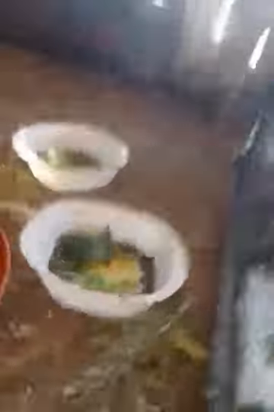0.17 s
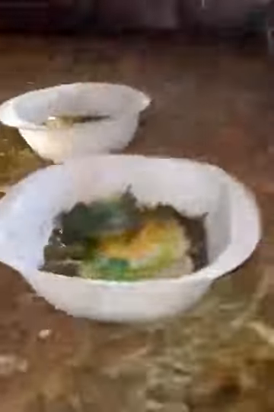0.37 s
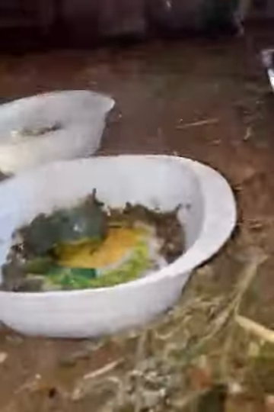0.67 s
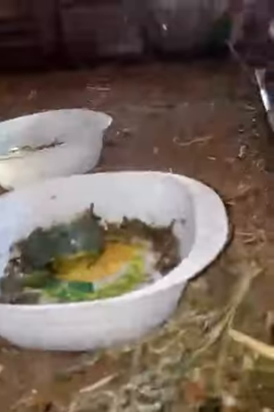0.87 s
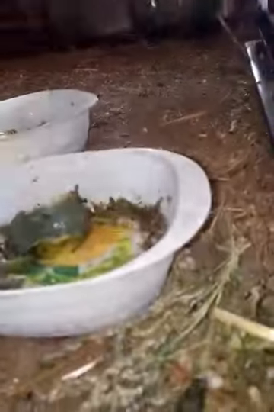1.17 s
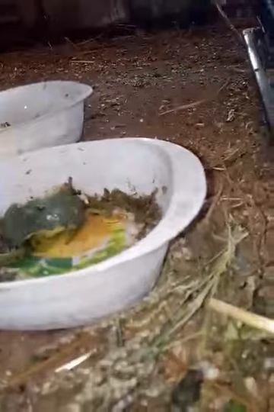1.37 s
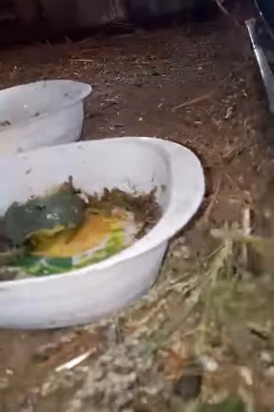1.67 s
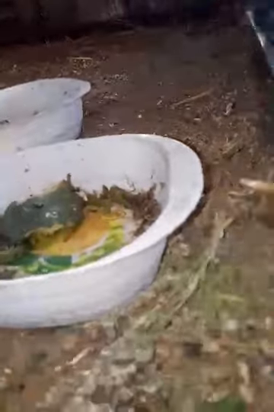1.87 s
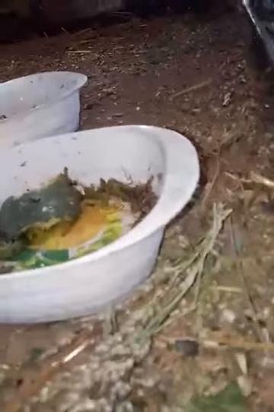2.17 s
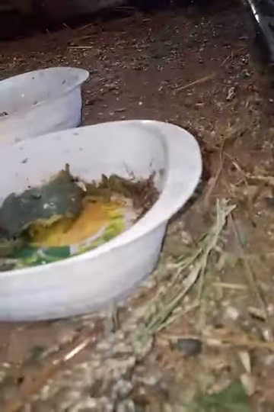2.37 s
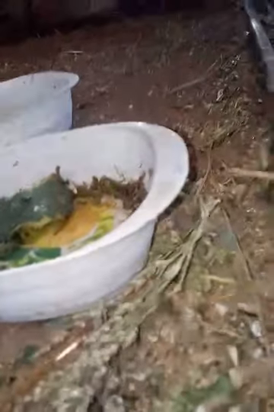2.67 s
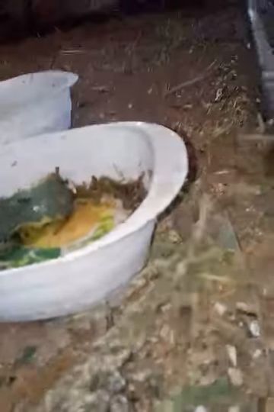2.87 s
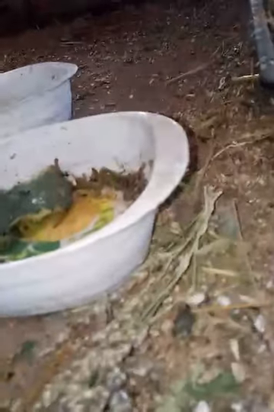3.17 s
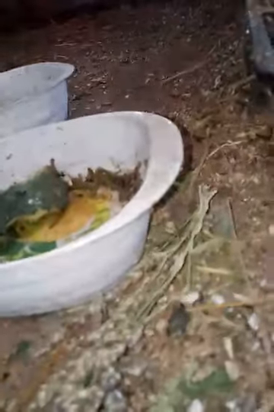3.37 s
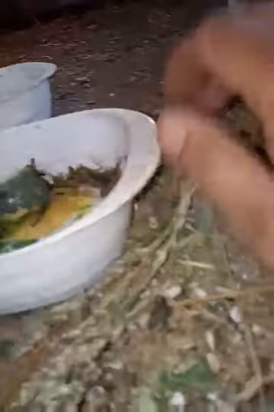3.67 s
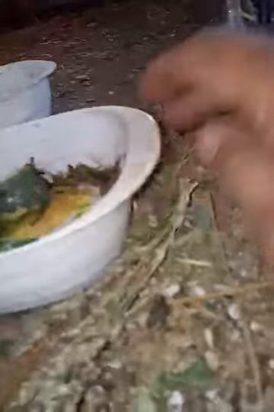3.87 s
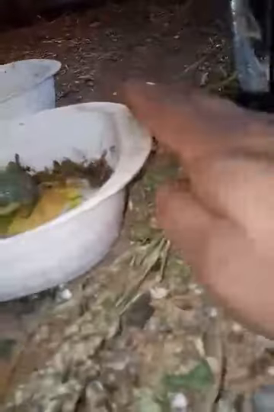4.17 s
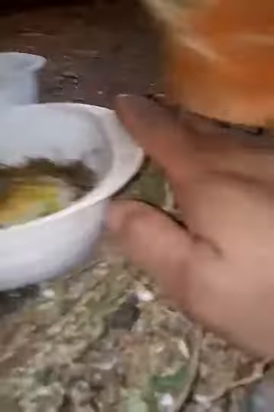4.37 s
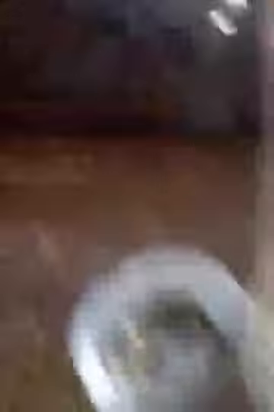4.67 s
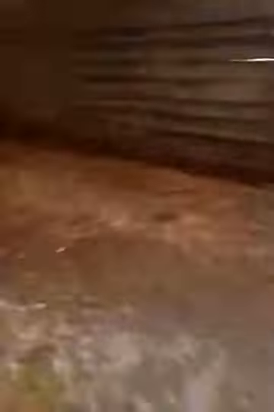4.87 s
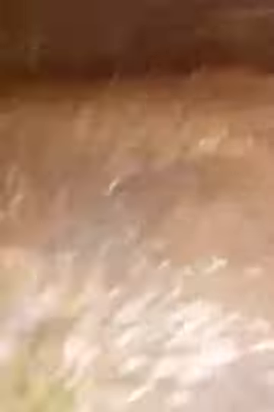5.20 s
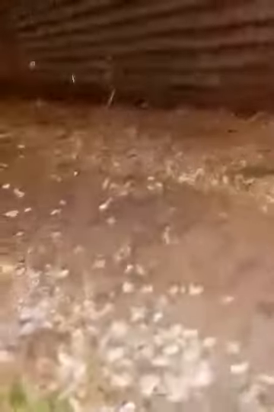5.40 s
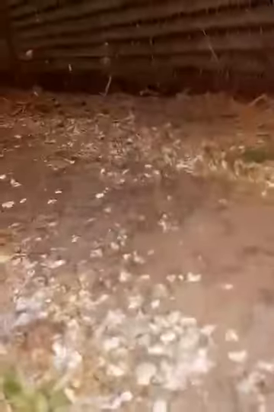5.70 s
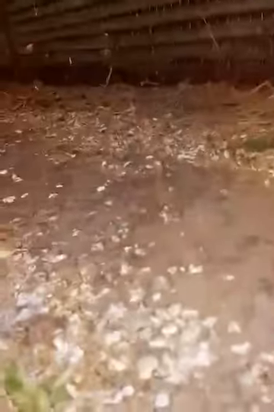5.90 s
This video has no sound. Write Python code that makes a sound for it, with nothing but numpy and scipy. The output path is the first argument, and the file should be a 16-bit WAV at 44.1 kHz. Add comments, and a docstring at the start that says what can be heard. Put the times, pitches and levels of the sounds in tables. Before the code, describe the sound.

A close handheld microphone in a small wire aviary, its right side muffled by a hand, over a faint low draught. In the first 0.3 seconds come tiny high chirps and a few wing flicks. Dull falling-pitched finger bumps and scuffs cluster from 0.2 to 1.1, mostly on the right, with a hoarse falling chirp at 0.9. From 1.1 to 2.0 wings clap rapidly, about fifteen beats a second, loudest near 1.4, with a bright feather rush from 1.65. It calms; a short chirp at 2.35. From 2.8 to 3.25 a breathy rush swells, with soft regular flaps until 3.6. Quiet until a bump, a chirp at 4.05 and five flaps to 4.4. Brief hollow rings and scuffs surround flaps at 4.8 to 5.0. A hard knock lands at 5.35, then faint breathy pips at 5.5 to 5.8, a dull flap at 5.64 and a last flutter near 6.

```python
"""Small parrots in a wire aviary

Small parrots flutter about a wire aviary beside a hand-held phone whose right port is covered by the hand.
Wing tips clap as short puffs of noise in a few bands; feathers rush as shaped turbulence over a low draught.
A few birds chirp in gliding partials, a farther one pips, and hollow modes ring briefly. Fingers bump the
case in waves of falling pitch and skin scuffs the port; sparse echoes follow the birds, and gain control ducks.
"""
import sys
import numpy as np
from scipy import signal
from scipy.fft import rfft, irfft
from scipy.io import wavfile
from scipy.ndimage import uniform_filter1d

SR = 44100
rng = np.random.default_rng(int(sys.argv[2]) if len(sys.argv) > 2 else 0)


def digitize_waveform(pressure):
    """Quantize a signal to 16-bit integers and store it at the path in sys.argv[1].

    Rows of a 2-D input are taken as channels; values are limited to [-1, 1].
    """
    field = np.atleast_2d(pressure).T
    bounded = np.clip(field, -1, 1)
    quanta = np.round(bounded * 32767).astype(np.int16)
    wavfile.write(sys.argv[1], SR, quanta)


N = 266319  # samples
EDGE_HZ = 15950  # upper band limit

# Contours of the calls: (share of length, pitch ratio, level [dB])
ARCH = [(0, 1.02, -10), (.13, .9, -7), (.25, .945, 0), (.38, .995, -1), (.5, .995, -1), (.61, .955, 2),
        (.8, .815, -4), (1, .69, -18)]
STEP = [(0, 1.03, -10), (.25, 1, 0), (.5, 1, 2), (.6, 1.2, -3), (.72, 1.27, -1), (1, 1.15, -8)]
FALL = [(0, .9, -12), (.1, 1, 2), (.27, 1.005, -1), (.47, .94, -3), (.57, .83, 0), (.7, .765, 2),
        (.8, .64, -4), (1, .65, -5)]
FLAT = [(0, 1, -18), (.5, 0.99, 2), (1, 1, -38)]
HOOK = [(0, .98, -10), (.09, .865, -1), (.28, .915, -1), (.45, .98, -3), (.56, 1, 0), (.64, .96, 0),
        (.74, .83, -4), (.92, .68, -9), (1, .65, -14)]


def amp(db):
    """Decibels express the logarithm of an amplitude ratio; this inverts them."""
    return 10 ** (np.asarray(db) / 20)


def evened(x):
    """Normalisation to unit root-mean-square strength."""
    return x / np.sqrt(np.mean(x ** 2) + 1e-20)


def read(points, hz):
    """Interpolation of a table along a logarithmic frequency axis."""
    f, value = np.transpose(points)
    return np.interp(np.log(hz + 1), np.log(f + 1), value)


def add(mix, s, sound):
    """Superposition: a sound is summed into the mix at s seconds."""
    part = mix[..., max(round(s * SR), 0):][..., :sound.shape[-1]]
    part += sound[..., :part.shape[-1]]


def coloured(x, points):
    """Spectral shaping: x is filtered by a table, then brought to unit strength."""
    gain = amp(read(points, np.fft.rfftfreq(len(x), 1 / SR)))
    return evened(irfft(rfft(x) * gain, len(x)))


def smoothed(x, span):
    """Two running means in succession act as a low-pass filter."""
    return uniform_filter1d(uniform_filter1d(x, size=span), size=span)


def resonate(x, hz, width):
    """Resonance by heterodyne: shifts hz down to zero, smooths twice, and shifts back."""
    turn = np.exp(2j * np.pi * hz * np.arange(len(x)) / SR)
    r = np.exp(-np.pi * width / SR)
    envelope = signal.lfilter([(1 - r) ** 2], [1, -2 * r, r * r], x / turn)
    return 2 * (turn * envelope).real


def lumps(lump_s, depth_db):
    """Random amplitude modulation: strength comes in lumps, as feathers and gusts do."""
    span = max(int(lump_s * SR), 2)
    return amp(depth_db * evened(smoothed(rng.standard_normal(N), span)))


def patchy(x, depth_db):
    """Time-frequency modulation: patches of pitch stand out and fade, as single feathers catch the air."""
    z = signal.stft(x, nperseg=1024, noverlap=768)[2]
    field = uniform_filter1d(rng.standard_normal(z.shape[1:]), size=5, axis=0)
    field = uniform_filter1d(field, size=6, axis=1)
    return signal.istft(z * amp(depth_db * evened(field)), nperseg=1024, noverlap=768)[1][:, :N]


def flight(t):
    """Turbulence levels add as amplitudes: background stir plus each flurry's rise, hold and fade."""
    # background stir of the flock: (time [s], feather rush [dB], fine rustle [dB], treble [dB])
    stir = [(0, -33.5, -34.5, -55), (.12, -52.5, -42, -66), (.24, -37, -42.5, -60),
            (.33, -42.5, -33.5, -53), (.42, -37.5, -51, -84), (.75, -42.5, -40, -64),
            (1.1, -46.5, -45.5, -62), (1.5, -43, -44.5, -60.5), (2.2, -35.5, -46, -79),
            (2.4, -41, -42.5, -67), (2.6, -41, -45.5, -68), (3.6, -43, -41, -65.5), (3.95, -44, -47, -72.5),
            (4.2, -38.5, -42, -63), (4.55, -42, -40, -56.5), (4.7, -54.5, -42.5, -61),
            (4.95, -51, -40.5, -63), (5.3, -40.5, -43, -55.5), (5.42, -43, -54.5, -61),
            (5.55, -47.5, -46.5, -65), (5.95, -49, -65, -79)]
    # a bird bursts into flight near the mesh: (start [s], held [s], rush [dB], rustle [dB], treble [dB],
    # brightness change while held [dB/s])
    flurries = [(0.493, 0.03, -39.5, -45, -53, 41), (0.854, 0.11, -34.5, -47, -73, 37),
                (1.643, 0.39, -27, -26.5, -45, -29.5), (2.632, 0.11, -34.5, -49, -79, -13),
                (2.785, 0.45, -24.5, -41, -58, 12), (5.65, 0.097, -39.5, -48, -72, -8),
                (5.976, .06, -34, -45.5, -64, -30)]
    takeoff_db, takeoff_s = 4, 0.019  # first strokes are hardest
    rise_s, settle_db_per_s = 0.0036, 77
    s, *levels = np.transpose(stir)
    gains = np.array([amp(np.interp(t, s, c)) for c in levels])
    for start, held, rush_db, rustle_db, treble_db, brighten_db in flurries:
        u = np.maximum(t - start, 0)
        shape_db = takeoff_db * np.exp(-u / takeoff_s) - settle_db_per_s * np.maximum(u - held, 0)
        bright_db = brighten_db * np.minimum(u, held)
        layers_db = np.array([rush_db + 0 * u, rustle_db + bright_db, treble_db + bright_db])
        gains = gains + np.minimum(u / rise_s, 1) * amp(shape_db + layers_db)
    return gains


def feathers():
    """Turbulent noise in four layers, drawn twice: once for each path to the ports."""
    # spectra of the layers: (frequency [Hz], relative density [dB per Hz])
    rush_colour = [(180, -24), (300, -15.5), (401, -10.5), (585, -7.5), (695, -12.5), (954, 0.5), (1220, 4),
                   (1860, -1.5), (2600, -65), (3380, -72), (5720, -120)]
    rustle_colour = [(1290, -15.5), (2200, 0.5), (2810, -1), (3350, 4.5), (3850, 2.5), (4350, -2),
                     (6700, -32), (7500, -47), (9750, -47), (16500, -120)]
    treble_colour = [(3820, -2.5), (6500, -4), (7880, -10.5), (9990, -9), (14500, -13.5), (16000, -9)]
    draught_colour = [(15, -65), (25, -25), (63, 0.5), (108, 5), (312, -2), (345, -4.5), (435, -2.5),
                      (800, -8), (1040, -23.5), (1760, -120)]
    # level of the low draught, before its gusts: (time [s], level [dB])
    draught_levels = [(0, -37.5), (.35, -43.5), (.5, -37.5), (1.15, -41), (1.4, -44.5), (2, -41),
                      (2.3, -39.5), (3.2, -37), (3.5, -45), (3.9, -38.5), (4.35, -45.5), (4.62, -37.5),
                      (4.75, -46.5), (5.1, -39.5), (5.6, -42.5), (6.03, -48)]
    t = np.arange(N) / SR
    rush, rustle, treble = flight(t)
    draught = amp(np.interp(t, *np.transpose(draught_levels)))
    strokes, grain = lumps(0.023, depth_db=1.25), lumps(0.0016, depth_db=1.5)
    gusts = lumps(0.019, depth_db=3.0)
    feather_noise = patchy(rng.standard_normal((2, N)), depth_db=2.54)
    paths = []
    for feather, wind in zip(feather_noise, rng.standard_normal((2, N))):
        beaten = feather * strokes * grain
        paths.append(rush * coloured(beaten, rush_colour) + rustle * coloured(beaten, rustle_colour)
                     + treble * coloured(beaten, treble_colour)
                     + draught * coloured(wind * gusts, draught_colour))
    return paths


def ring(row, noise):
    """Modal resonance: rubbing keeps one hollow mode sounding for a moment."""
    s, peak_db, hz, ms = row
    tone = resonate(noise, hz, 0.26 * hz)[-max(int(ms * SR / 1000), 9):]
    return s, amp(peak_db) * tone / abs(tone).max() * signal.windows.tukey(len(tone), .4)


def scuffs():
    """Stick-slip friction: skin sticks and slips in dull, gritty bursts."""
    # skin sliding over the covered port: (start [s], length [s], level [dB])
    slides = [(0.123, 0.11, -42), (0.316, 0.086, -31.5), (0.498, 0.078, -31), (1, 0.19, -36.5),
              (4.585, 0.046, -35), (4.911, 0.031, -32), (4.977, 0.13, -27)]
    # spectrum of the friction: (frequency [Hz], relative density [dB per Hz])
    skin_colour = [(100, 3), (300, -1.5), (600, 9.5), (1200, -10.5), (1800, -2.5), (4000, -39),
                   (16000, -109)]
    gate = np.zeros(N)
    for s, length, db in slides:
        add(gate, s, amp(db) * signal.windows.tukey(max(int(length * SR), 9), .4))
    return gate * coloured(rng.standard_normal(N) * lumps(0.0012, depth_db=7.0), skin_colour)


def bump(row, noise):
    """Dispersion of flexural waves: quick waves arrive first, so the pitch drops within a few cycles."""
    s, peak_db, drop_hz, ms, pan_db = row
    t = np.arange(len(noise)) / SR
    u = t * 1000 / max(ms, .3)  # time in units of the flex time
    uneven = evened(smoothed(noise, 60))
    hz = (85 + drop_hz * np.exp(-.9 * u)) * (1 + 0.2 * uneven)
    turn = 2 * np.pi * np.cumsum(hz) / SR
    decay = np.exp(-(u / 3.2) ** 2) + 0.22 * np.exp(-(u / 7.8) ** 2)
    flex = np.sin(turn) * (1 - np.exp(-3.0 * u)) * decay
    nail_tick = 0.21 * smoothed(noise, 6) * np.exp(-t / 0.0018)
    wave = flex + nail_tick
    ports = amp([[pan_db / 2], [-pan_db / 2]])
    return s, amp(peak_db) * wave / abs(wave).max() * ports / ports.mean()


def pip(row, noise):
    """Noise-excited resonances form a breathy whistle a few milliseconds long."""
    # breathy partials: (frequency [Hz], width [Hz], level [dB])
    partials = [(2060, 600, 7), (3840, 930, 7.5), (5800, 890, -1.5)]
    s, level_db = row
    tone = sum(amp(db) * evened(resonate(noise, hz, width)) for hz, width, db in partials)
    return s, amp(level_db) * tone * np.hanning(len(noise))


def chirp(shape, start, length, pitch_hz, call_db, first_db, side_db, upper_db, hoarse):
    """Harmonic series set against its second partial, with a sideband; random wobble makes it hoarse."""
    # upper partials: (frequency [Hz], level relative to the second partial [dB])
    overtones = [(5600, -9), (7000, -29.5), (8000, -39), (10400, -28.5), (13000, -40)]
    first_fade_db = 61  # the first partial weakens as the pitch climbs: dB per unit of pitch ratio
    share, ratio, shape_db = np.transpose(shape)
    t = np.arange(0, length, 1 / SR)
    hz = pitch_hz * np.interp(t / length, share, ratio)
    level_db = call_db + np.interp(t / length, share, shape_db)
    wobble, flutter = (evened(smoothed(v, 40)) for v in rng.standard_normal((2, len(t))))
    turn = 2 * np.pi * np.cumsum(hz * (1 + 0.068 * hoarse * wobble)) / SR
    climb = np.maximum(hz / pitch_hz - 1, 0)
    second = np.sin(2 * turn)
    first = amp(first_db - first_fade_db * climb) * np.sin(turn)
    sideband = amp(side_db) * np.sin(2 * turn + 2 * np.pi * 1250 * t)
    tone = second + first + sideband
    for k in np.arange(3, 7):
        partial = amp(upper_db + read(overtones, k * hz)) * np.sin(k * turn)
        tone += partial * (k * hz < EDGE_HZ)
    throb = (1 + 0.26 * np.sin(2 * np.pi * 140 * t)) * (1 + 0.19 * hoarse * flutter)
    return start, amp(level_db) * tone * throb * signal.windows.tukey(len(t), .1)


def clap(row, noise):
    """Impulsive excitation of resonances: a puff of noise swells to a snap, heard in a few bands."""
    s, peak_db, hz, body_db, treble_db, ms = row
    u = (np.arange(len(noise)) / SR - .004) * 1000 / max(ms, .3)  # time from the snap, per length
    swell, decay = np.exp(2.0 * np.minimum(u, 0)), np.exp(-1.4 * np.maximum(u, 0))
    puff = noise * np.where(u < 0, swell, decay)
    snap = puff + 1.2 * (np.arange(len(noise)) == round(.004 * SR))
    bands = [resonate(resonate(snap, hz, 2200), hz, 2200), resonate(resonate(snap, 1230, 1770), 1230, 1770),
             resonate(puff, 8400, 8000), resonate(puff, 6080, 1540)]
    top, body, treble, swish = (b / abs(b).max() for b in bands)
    top = top + amp(-16.5) * min(ms / 5, 1) * swish  # slower strokes add a swish of feather tips
    return s - .003, amp(peak_db) * (top + amp(body_db) * body + amp(treble_db) * treble)


def aviary(x, t60):
    """Reverberation: sparse echoes of random sign die away exponentially between the walls."""
    at = np.arange(200, SR // 2, 20) + rng.integers(0, 20, (SR // 2 - 181) // 20)
    taps = np.zeros(SR // 2 + 20)
    taps[at] = rng.choice([-1., 1.], len(at)) * amp(-60 * at / SR / t60)
    return signal.fftconvolve(x, taps / np.linalg.norm(taps))[:N]


def covered_port(events, direct, scattered, delay_s=.0002):
    """Obstruction and scattering: the hand dulls and delays sound, and much leaks in by scattered paths."""
    # loss at the covered port: (frequency [Hz], loss [dB])
    covered_loss = [(60, 4.5), (110, 6.5), (200, 8.5), (380, 9), (700, 8), (1290, 16.5), (2380, 22.5),
                    (4400, 24), (8120, 21.5), (15000, 27)]
    # likeness of the two ports: (frequency [Hz], likeness [0-1])
    likeness = [(60, 0.6), (300, 0.95), (700, 0.61), (1500, 0.079), (5000, 0.25), (15000, .2)]
    hz = np.fft.rfftfreq(N, 1 / SR)
    leak = rng.standard_normal(3000) * np.exp(-np.arange(3000) / 120.0)
    same = np.clip(read(likeness, hz), 0, 1)
    leaked = rfft(events) * rfft(leak / np.linalg.norm(leak), N) + rfft(scattered)
    delayed = rfft(events + direct) * np.exp(-2j * np.pi * hz * delay_s)
    paths = same * delayed + np.sqrt(1 - same ** 2) * leaked
    return irfft(paths * amp(-read(covered_loss, hz)), N)


def scene():
    """Superposition of airborne sound at the open left and covered right ports with contact sound."""
    # wing tips clapping in free air: (time [s], snap peak [dB], centre [Hz],
    # treble relative to the snap [dB], length scale [ms])
    claps = [(.2039, -12.5, 2970, -24.5, 2.3), (0.351, -18.5, 2280, -9, 0.64), (.52, -17.5, 3700, -23, 4.3),
             (1.041, -21.5, 4350, -19, 2.7), (1.102, -21, 3820, -35, 1.4), (1.1138, -11.5, 4020, -30, 1.5),
             (1.1824, -10, 3840, -29, 1.8), (1.2497, -11.5, 4020, -28, 2.8), (1.3054, -23, 4000, -35, 3.6),
             (1.318, -12.5, 4160, -23.5, 2.7), (1.3854, -3.5, 3930, -23, 1.8), (1.456, -14, 3900, -25, 4.1),
             (1.5245, -11.5, 4020, -25, 2), (1.592, -10, 4000, -21, 1.9), (2.798, -11.5, 3800, -27, 9),
             (2.9556, -23.5, 3930, -10, 1.8), (3.022, -18, 3800, -19, 2.5), (3.0904, -17, 4000, -20, 2.1),
             (3.16, -15, 3650, -20, 3.7), (3.2314, -13.5, 3850, -23, 4.3), (3.2884, -13.5, 3700, -34, 6.5),
             (3.307, -15, 4030, -23, 6), (3.351, -14, 3680, -31, 6.3), (3.3818, -16, 3570, -24, 6.6),
             (3.4124, -20, 3300, -38, 11), (3.4534, -20, 3350, -19.5, 5.9), (3.48, -23, 3200, -37, 9.3),
             (3.548, -19, 3900, -44, 5.8), (3.6165, -18, 3900, -30, 6.1), (4.168, -19, 4400, -22, 5.9),
             (4.2286, -12.5, 3380, -34, 4.9), (4.283, -18, 3500, -22, 12), (4.342, -18, 4100, -30, 9.2),
             (4.4024, -24, 4460, -32, 5.3), (4.822, -15.5, 3150, -27, 3.7), (4.8794, -13, 3170, -27, 4.7),
             (4.9387, -13.5, 3240, -18.5, 5.3), (4.971, -16.5, 3440, -10.5, 1.2),
             (5.92, -28.5, 2750, -50, 1.1)]
    # wings beating against mesh and perches, with a dull body: (time [s], snap peak [dB], centre [Hz],
    # body peak [dB], length scale [ms])
    strikes = [(.131, -21, 3080, -32, 12), (0.1523, -14, 3060, -19.5, 15), (0.424, -14, 2490, -17, 6.8),
               (0.4648, -14.5, 2250, -22, 5.9), (1.1412, -20, 2660, -19, 1.8), (1.37, -20.5, 4030, -24, 7),
               (1.5663, -24, 4000, -12, 20), (1.6443, -19, 3570, -33, 6.8), (1.664, -12.5, 4050, -9, 14),
               (1.7544, -16, 3500, -18, 1.5), (1.8364, -17, 3250, -16, 1.7),
               (1.8712, -20.5, 3840, -13.5, 8.4), (1.942, -16.5, 3680, -21, 3.8),
               (2.6326, -37, 3180, -20, 3.5), (2.832, -13.5, 3640, -21, 1.2), (2.89, -20.5, 4250, -12, 5.7),
               (4.0454, -29, 4200, -16, 3.7), (4.597, -24, 3370, -19.5, 27), (4.6327, -20, 3500, -23, 1.8),
               (5.3322, -29.5, 3730, -19.5, 3.6), (5.6351, -24, 2260, -6.5, 1.24),
               (5.6632, -30.5, 3580, -25, 5), (5.9803, -24.5, 2900, -24.5, 13)]
    # calls: (contour, start [s], length [s], base pitch [Hz], level [dB], first partial [dB],
    # sideband [dB], overtones [dB], hoarseness [0-1])
    chirps = [(FLAT, 0, 0.019, 2310, -41.5, 20.4, -28, -3, 0.43),
              (STEP, .031, .036, 2560, -21, 3.4, -30, 4.9, 0.27),
              (FLAT, .064, 0.02, 2615, -14.5, -14, -30, 5.1, 0.32),
              (STEP, .258, .034, 2450, -31, 3.9, -22, 4.4, 0.48),
              (FALL, .9, .15, 2115, -26, -4, -10.5, -3.4, 0.39),
              (HOOK, 2.349, .093, 2345, -22, -9.5, -42, -5.5, 0.14),
              (ARCH, 4.054, 0.099, 2315, -21.5, -10.5, -42, -1.2, 0.19)]
    # clipped pips of a farther bird, one a wingbeat: (start [s], level [dB])
    pips = [(5.502, -38), (5.562, -46.5), (5.616, -43.5), (5.676, -50), (5.732, -44.5), (5.79, -42.5)]
    # short hollow rings, as of a nudged dish: (start [s], peak [dB], frequency [Hz], length [ms])
    rings = [(4.388, -22, 1130, 31), (4.594, -18, 1075, 43), (5.268, -28, 640, 22), (5.592, -24, 318, 16.3)]
    # fingers bumping the case: (start [s], mean peak of the ports [dB], pitch drop [Hz],
    # flex time [ms], left minus right [dB])
    bumps = [(0.2252, -9, 1040, 2.6, -21), (0.332, -20.5, 950, 1.33, -11), (0.513, -22, 194, 5.4, 4),
             (0.5305, -11, 805, 0.52, -28), (0.555, -25, 920, 2.9, -25), (0.579, -11.5, 1074, 2.9, -38),
             (0.631, -12, 870, 2.56, -43), (0.83, -10, 1190, 3.1, -35), (0.9497, -14, 950, 2.6, -23),
             (0.963, -23, 700, 2.8, -23), (1.018, -22.5, 497, 3, -5), (1.0251, -22, 497, 2.2, -26),
             (1.05, -15, 790, 1.8, -29), (1.062, -19.5, 150, 4.5, -12), (1.088, -15, 604, 1.9, 10),
             (4.13, -18, 1520, 1.56, 8), (4.576, -27.5, 150, 3.7, 22), (4.835, -25, 130, 5.4, -3),
             (5.3489, -5, 1620, 0.74, -34)]
    clap_body_db, strike_treble_db = -37.5, -30.5  # relative to the snap
    preamp_db = 5  # gain on what arrives through the air
    wings, calls, case = np.zeros(N), np.zeros(N), np.zeros((2, N))
    strokes = [(s, db, hz, clap_body_db, treble_db, ms) for s, db, hz, treble_db, ms in claps]
    strokes += [(s, db, hz, body_db - db, strike_treble_db, ms) for s, db, hz, body_db, ms in strikes]
    for row, noise in zip(strokes, rng.standard_normal((len(strokes), 1500))):
        add(wings, *clap(row, noise))
    for row in chirps:
        add(calls, *chirp(*row))
    for row, noise in zip(pips, rng.standard_normal((len(pips), 520))):
        add(wings, *pip(row, noise))
    for row, noise in zip(rings, rng.standard_normal((len(rings), 4000))):
        add(wings, *ring(row, noise))
    for row, noise in zip(bumps, rng.standard_normal((len(bumps), 2200))):
        add(case, *bump(row, noise))
    wing_echo = amp(-9.5) * aviary(wings, t60=0.24)
    call_echo = amp(-4) * aviary(calls, t60=.42)  # the calls come from across the aviary
    birds = wings + calls + wing_echo + call_echo
    direct, scattered = feathers()
    air = np.array([birds + direct, covered_port(birds, direct, scattered)])
    return amp(preamp_db) * air + case + scuffs() * amp([[-12], [0]])


def record(dry):
    """Compression: gain control ducks both channels after loud sounds; then clipping and a band limit."""
    threshold_db, recovery_db_per_s = -17.0, 170.0
    slope = .85  # dB of ducking per dB over the threshold
    ceiling = .97
    power = abs(uniform_filter1d((dry ** 2).max(0), size=200, origin=99))
    power_db = 10 * np.log10(power + 1e-12)
    fall = np.arange(N) * recovery_db_per_s / SR
    held_db = np.maximum.accumulate(power_db + fall) - fall  # peaks held, then falling steadily
    over_db = np.maximum(held_db - threshold_db, 0)
    duck_db = slope * uniform_filter1d(over_db, size=100, origin=49)
    ducked = np.clip(dry / amp(duck_db), -ceiling, ceiling)
    low_pass = signal.firwin(1023, EDGE_HZ, window=("kaiser", 12), fs=SR)
    return signal.oaconvolve(ducked, low_pass[None], "same")


dry = scene()
out = record(dry)
digitize_waveform(out)
```